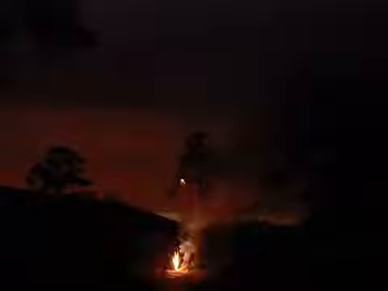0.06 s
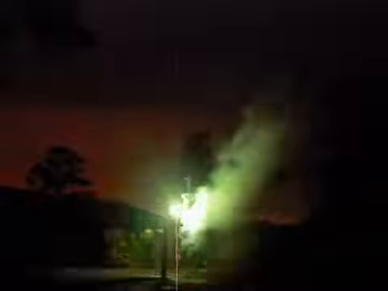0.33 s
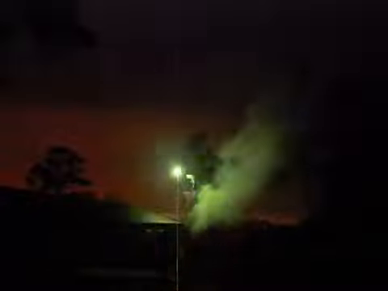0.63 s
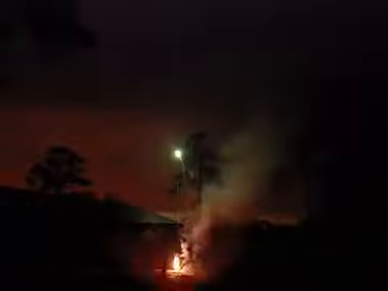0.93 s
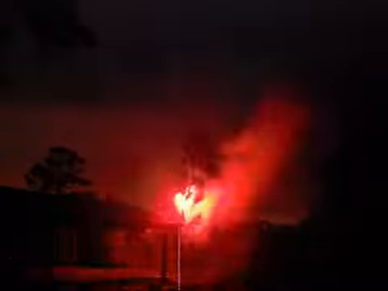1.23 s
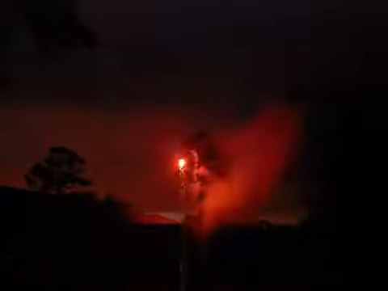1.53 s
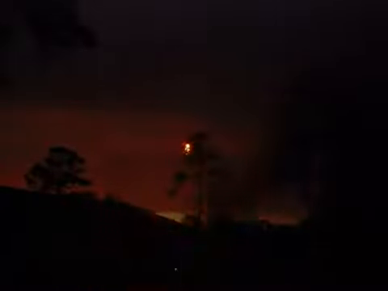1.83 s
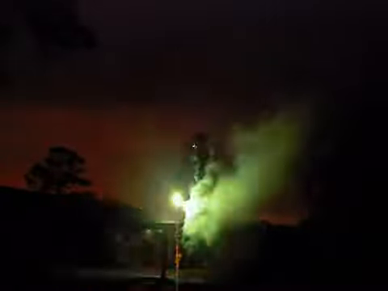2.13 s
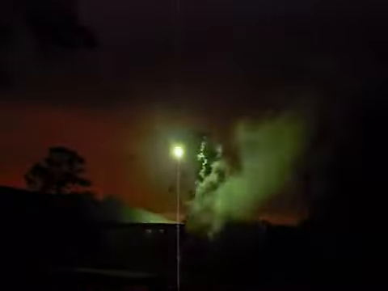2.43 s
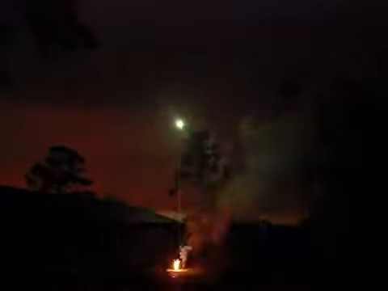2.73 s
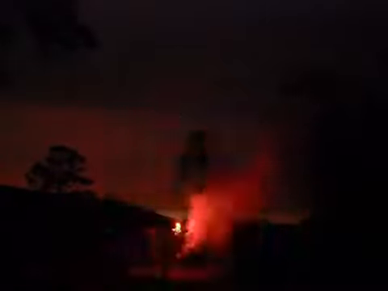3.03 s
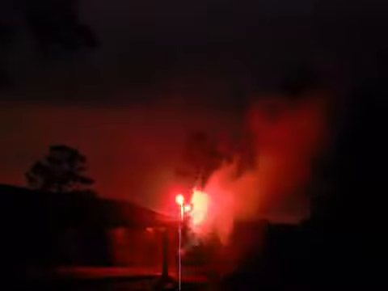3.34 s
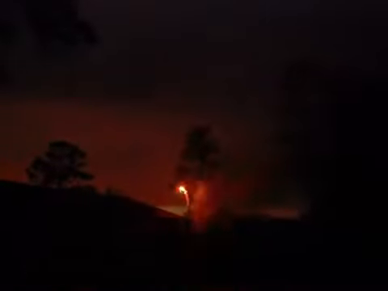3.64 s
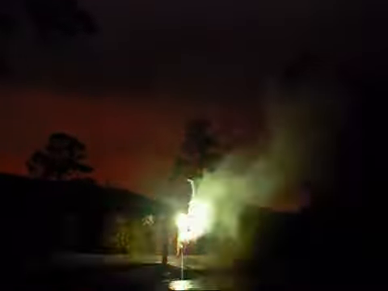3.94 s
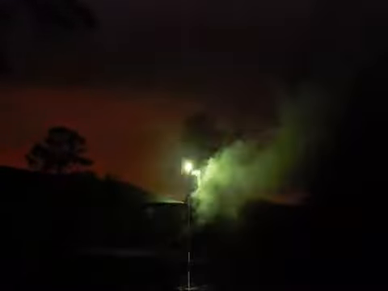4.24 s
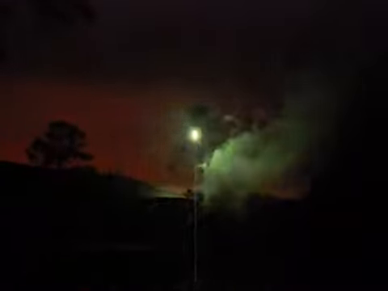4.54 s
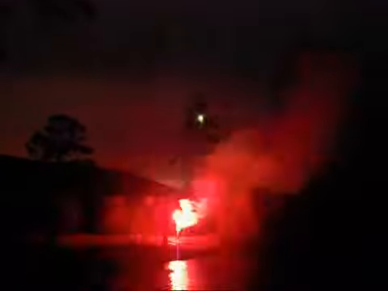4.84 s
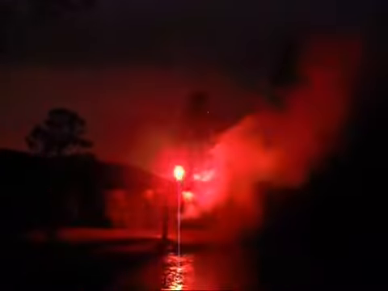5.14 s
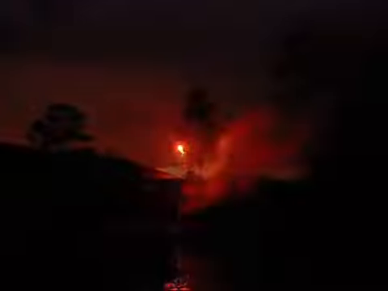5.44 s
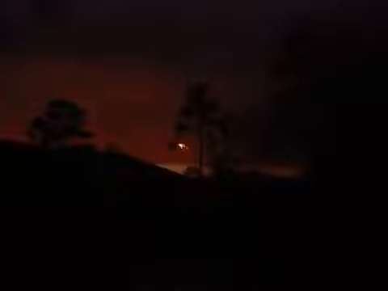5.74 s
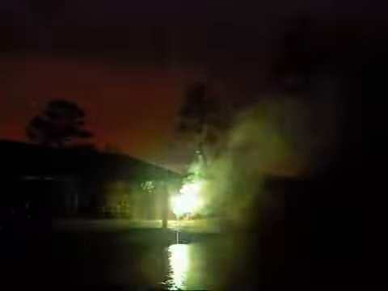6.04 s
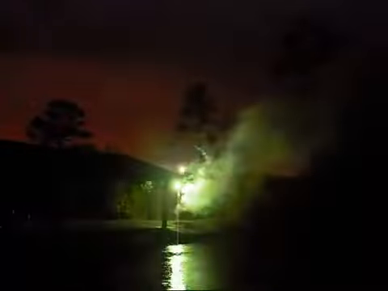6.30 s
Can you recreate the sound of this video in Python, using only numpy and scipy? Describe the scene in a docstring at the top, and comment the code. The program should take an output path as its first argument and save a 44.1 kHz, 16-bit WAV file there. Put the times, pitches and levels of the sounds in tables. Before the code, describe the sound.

The tail of an earlier firework shot dies away, then six more blasts crack out at an even pace, close and slightly distorted. Each leaves a short echo and a longer rolling decay across open ground and trees. Faint far pops and dry snaps fill the gaps, and a thin fuse hiss and sputter follows the last shot. The background is soft outdoor night air with barely audible distant traffic.

```python
"""A firework cake fires six shots beside a pond at night, close enough to overload the microphone.
Each blast (shock front, suction, gas crack, tube ring) scatters off the ground, a house and the trees,
then rolls away; an earlier shot is still dying at the start. Dull far pops and dry crackles fall between
the shots, and a fuse fizzes near the end. Under it all: faint night air, far tyres and an engine hum."""
import sys
import numpy as np
from scipy import signal
from scipy.fft import rfft, irfft, next_fast_len
from scipy.io import wavfile
from scipy.ndimage import map_coordinates

SR = 44100
rng = np.random.default_rng(int(sys.argv[2]) if len(sys.argv) > 2 else 0)


def store_wav(level_fs):
    """Save 16-bit WAV to argv[1]."""
    pcm = np.round(np.clip(np.atleast_2d(level_fs), -1, 1) * 32767)
    wavfile.write(sys.argv[1], SR, pcm.T.astype(np.int16))


N = 285327

# Escaping-gas spectrum: f/Hz, level/dB
GAS_SPECTRUM = [(60, -11), (150, 0.5), (300, 5.5), (480, 8.5), (600, -10), (800, -5.5), (1200, -3),
                (2800, -3), (5000, -19), (12000, -39)]
TUBE_HZ, TUBE_T60_S = 788, 0.026


def blast(front_db, push_ms, suction_db, suction_ms, crack_db, ring_db):
    """Shock front, suction as the gas ball falls back, crack of escaping gas, ring of the empty tube."""
    t = np.arange(SR // 10) / SR
    ms = t * 1000
    front = amp(front_db) * (1 - ms / push_ms) * np.exp(-ms / push_ms) * rise(ms, 0.07)
    suction = -amp(suction_db) * np.exp(-((ms - suction_ms) / 0.6) ** 2)
    gas = noise(GAS_SPECTRUM, len(t)) * fade(t, 0.029) * rise(t, 0.0014)
    crack = amp(crack_db - 7) * gas / np.std(gas[:SR // 100])  # level set over the first 10 ms
    ring = amp(ring_db) * np.sin(2 * np.pi * TUBE_HZ * t) * fade(t, TUBE_T60_S) * rise(t, 0.00026)
    return front + suction + crack + ring


# Launches: t/s, front/dB, push length/ms, suction/dB, suction delay/ms, relative crack/dB, tube ring/dB
LAUNCHES = [(0.7499, 11, 0.99, -0.5, 3.1, 3.5, 4.5), (1.5927, 18, 0.52, 8, 3.6, -1, -28),
            (2.5426, 15.5, 0.39, 1.5, 3.84, 2, -4), (3.5428, 12, 0.97, -13, 2.7, 0.5, 2.5),
            (4.5383, 24, 0.27, 16, 3.87, -3, -23), (5.4542, 24, 0.31, 22.5, 4.44, 2.5, -19)]
EARLIER_SHOT_S, REVERB_GAIN_DB = -0.19, 1.1


def shots():
    """Each launch with its own reverberation, after the tail of an earlier shot."""
    out = np.zeros(N)
    add(out, EARLIER_SHOT_S, amp(REVERB_GAIN_DB) * reverberation())
    for start_s, *charge in LAUNCHES:
        add(out, start_s, blast(*charge))
        add(out, start_s, amp(REVERB_GAIN_DB) * reverberation())
    return out


# Spectra of near scatter, trees, far roll and walls: f/Hz, level/dB
NEAR_SPECTRUM = [(40, -34), (130, -45), (300, -3), (500, -1), (620, 1.5), (800, -4.5), (1250, -9.5),
                 (2000, 0.5), (2900, 2.5), (4200, -4), (5500, -1.5), (8000, -8.5), (12500, -16.5)]
TREE_SPECTRUM = [(40, -17), (200, -15), (400, -2), (750, 7), (1300, -8.5), (1900, -6), (2800, -1),
                 (4200, -5.5), (5500, -5), (8000, -9), (12500, -15.5)]
ROLL_SPECTRUM = [(60, -37), (250, -7.5), (450, -2.5), (730, 2.5), (1000, -1.5), (1300, -10), (1900, 0),
                 (2800, -6), (4500, -19.5), (8000, -22.5), (12500, -33)]
WALL_SPECTRUM = [(60, -34), (200, -17), (450, 0), (800, 5.5), (1300, -3.5), (2400, 5), (4000, -11.5),
                 (6000, -15.5), (12500, -46)]
# Decay among the trees, the top treble shortened by the air: f/Hz, t60/s
TREE_T60 = [(100, 0.43), (700, 0.29), (2500, 1), (5500, 0.92), (8000, 0.69), (12000, 0.55)]
# Echoes off walls and tree lines: delay/s, relative level/dB, t60/s, rise/s
WALL_ECHOES = [(.03, -19.5, 0.041, 0.0012), (.047, -16.5, 0.068, 0.0022), (.0645, -18.5, 0.083, 0.0033),
               (.124, -26, 0.056, .005), (.138, -25.5, .04, .001), (.197, -29.5, 0.069, 0.0019)]


def reverberation():
    """One shot scattered by near ground and house, trees and single walls, with a long far roll."""
    size = 2 * SR
    t = np.arange(size) / SR
    near = amp(-10.5) * noise(NEAR_SPECTRUM, size) * fade(t, 0.22) * rise(t, 0.0022)
    hz, frame_s, bins = signal.stft(noise(TREE_SPECTRUM, size), SR, nperseg=256)
    bins = bins * fade(frame_s, along(TREE_T60, hz)[:, None])
    trees = amp(-20.5) * signal.istft(bins, SR, nperseg=256)[1][:size] * rise(t, 0.004)
    roll = amp(-31) * noise(ROLL_SPECTRUM, size) * fade(t, 2.177) * rise(t, 0.16)
    grain_db = 0.6 * wobble(70, size) + 1.3 * wobble(900, size)  # separate trunks and roofs
    tail = (near + trees + roll) * amp(grain_db)
    echo_t = t[:SR // 5]
    for delay_s, level_db, t60_s, rise_s in WALL_ECHOES:
        envelope = amp(level_db + rng.normal(0, 0.97)) * fade(echo_t, t60_s) * rise(echo_t, rise_s)
        add(tail, delay_s, envelope * noise(WALL_SPECTRUM, len(echo_t)))
    return tail


# Far pops, about half a second from the shots: t/s, level/dB
FAR_POPS = [(0.248, -28), (1.129, -31), (2.0695, -25), (2.939, -31.5), (3.982, -26.5), (4.93, -28.5),
            (6.077, -34)]
# Pop spectrum before the treble cut: f/Hz, level/dB
POP_SPECTRUM = [(60, -2), (300, 1.5), (750, 12.5), (1300, -12), (2200, -3), (3200, 1), (5000, 1),
                (7000, -13), (12500, -19)]


def pops():
    """Far pops arrive blurred, with a soft front and a short tail."""
    out = np.zeros(N)
    t = np.arange(SR // 3) / SR
    envelope = rise(t, 0.00068) * (fade(t, 0.044) + amp(-14.5) * fade(t, 0.14))
    for start_s, level_db in FAR_POPS:
        burst = noise(POP_SPECTRUM, len(t))
        dulled = filtered(burst, lambda hz: amp(along([(1500, 0), (5000, -5)], hz)))
        add(out, start_s, amp(level_db) * dulled * envelope)
    return out


# Dry snaps: t/s, peak level/dB, f/Hz, half-width/octaves, click re body/dB
SNAPS = [(0.08, -24.5, 2720, 0.31, -21), (2.2654, -22.5, 730, 0.59, -2), (2.292, -25.5, 4140, 0.55, -7),
         (2.4605, -22.5, 2320, 0.2, -11), (3.1498, -26.5, 897, 0.08, -20), (3.795, -17, 2350, .17, -20),
         (6.309, -31, 2130, 0.21, -14), (6.4273, -28, 900, 0.56, -15)]
SNAP_T60_CYCLES, CLICK_HZ, CLICK_T60_S = 27, 2900, 0.011


def crackles():
    """Dry snaps: one band of noise under a bright click; low ones last longer."""
    out = np.zeros(N)
    t = np.arange(SR // 6) / SR
    for start_s, peak_db, hz, octaves, click_db in SNAPS:
        body = band(hz, octaves, len(t)) * fade(t, SNAP_T60_CYCLES / hz)
        click = amp(click_db) * band(CLICK_HZ, 0.28, len(t)) * fade(t, CLICK_T60_S)
        snap = (body + click) * rise(t, 0.0003)
        add(out, start_s, amp(peak_db) * snap / np.abs(snap).max())
    return out


def fuse(hiss_start_s=5.9, sputter_start_s=6.24):
    """The fuse catches and burns towards the next tube: a thin hiss, then a lower, uneven sputter."""
    t = np.arange(N) / SR
    hiss = amp(-56.5 + 1.4 * wobble(120, N)) * band(6900, 0.33, N)
    hiss *= rise(np.maximum(t - hiss_start_s, 0), 0.25)
    sputter = amp(-44 + 3 * wobble(60, N)) * band(950, 0.25, N)
    sputter *= rise(np.maximum(t - sputter_start_s, 0), 0.094)
    return hiss + sputter


# Night air spectrum: f/Hz, level/dB
AIR_SPECTRUM = [(15, -24), (25, -8), (75, -5), (113, -3.5), (228, -5), (273, -8.5), (364, -8), (404, -8.5),
                (524, -8.5), (697, -15), (978, -7.5), (1200, -16), (3070, -14.5), (5030, -20.5),
                (12500, -32.5), (16200, -65), (22000, -120)]
# Night air loudness: t/s, level/dB
AIR_LULL = [(0, -46), (3.4, -47), (4.4, -47.5), (5.3, -46.5), (6.47, -44.5)]


def air():
    """Night air: broad, slowly drifting noise that lulls in the middle."""
    level_db = np.interp(np.arange(N) / SR, *np.transpose(AIR_LULL))
    return amp(level_db + 0.6 * wobble(6.27, N)) * noise(AIR_SPECTRUM, N)


def tyres(centre_hz, width_hz):
    """The narrow, wavering roar of tyres on a far road."""
    roar = filtered(rng.standard_normal(N), lambda hz: 1 / (1 + np.abs((hz - centre_hz) / width_hz) ** 3))
    return amp(wobble(16, N)) * unit(roar)


def traffic(car_fade_db_per_s=10):
    """A steady far murmur, and one car drawing away at the start."""
    t = np.arange(N) / SR
    murmur = amp(-52) * tyres(centre_hz=719, width_hz=146)
    car = amp(-39 - car_fade_db_per_s * t) * tyres(centre_hz=609, width_hz=113)
    return murmur + car


def engine(hum_hz=105.3, fade_db_per_s=1.2, swell_db=9.5, pass_s=3.2, swell_s=0.4):
    """A far engine's wavering hum fades slowly and swells once as it passes."""
    t = np.arange(N) / SR
    level_db = -56 - fade_db_per_s * t + swell_db / (1 + ((t - pass_s) / swell_s) ** 2)
    pitch_hz = hum_hz + 2.65 * wobble(3.5, N)
    note = np.sin(2 * np.pi * np.cumsum(pitch_hz) / SR)
    waver = amp(-0.5) * band(hum_hz, 0.046, N)
    return amp(level_db) * unit(note + waver)


def amp(db):
    """dB to gain."""
    return 10 ** (np.asarray(db) / 20)


def unit(x):
    """Scale to rms 1."""
    return x / np.sqrt(np.mean(x ** 2) + 1e-20)


def along(points, hz):
    """Interpolate (f/Hz, value) points on a log axis."""
    point_hz, values = np.transpose(points)
    return np.interp(np.log(hz + 1), np.log(point_hz), values)


def wobble(knots_per_s, size):
    """Smooth random curve."""
    knots = rng.standard_normal(size // 16)
    return map_coordinates(knots, [np.arange(size) * knots_per_s / SR], mode="mirror")


def filtered(x, response):
    """Zero-phase filter with gain response(hz)."""
    padded = next_fast_len(len(x) + SR // 4)
    return irfft(rfft(x, padded) * response(np.fft.rfftfreq(padded, 1 / SR)), padded)[:len(x)]


def noise(spectrum, size):
    """Coloured noise, rms 1."""
    return unit(filtered(rng.standard_normal(size), lambda hz: amp(along(spectrum, hz))))


def band(centre_hz, octaves, size):
    """Noise in one bell-shaped band, rms 1."""
    white = rng.standard_normal(size)
    return unit(filtered(white, lambda hz: 1 / (1 + (np.log2((hz + 1) / centre_hz) / octaves) ** 4) ** .5))


def fade(t, t60_s):
    """Gain falling 60 dB in t60_s."""
    return np.exp(-np.log(1000) * t / t60_s)


def rise(t, tau):
    """Gain building to 1; tau in the unit of t."""
    return 1 - np.exp(-t / tau)


def add(out, start_s, sound):
    """Mix in at start_s, which may be negative."""
    i = round(start_s * SR)
    part = sound[max(-i, 0):max(len(out) - i, 0)]
    out[max(i, 0):][:len(part)] += part


def scene():
    """All sources at one microphone."""
    return (shots() + pops() + crackles() + fuse() + air() + traffic() + engine())[None]


MIC_HZ, CLIP_LEVEL = 12700, 0.96


def record(dry):
    """The band-limited microphone stage clips on every blast and rounds the clipped edges."""
    narrowed = signal.sosfilt(signal.ellip(10, 0.3, 70, MIC_HZ, fs=SR, output="sos"), dry[0])
    clipped = narrowed / (1 + np.abs(narrowed / CLIP_LEVEL) ** 8) ** (1 / 8)
    rounded = filtered(clipped, lambda hz: amp(along([(MIC_HZ, 0), (13500, -9), (16000, -14)], hz)))
    return signal.sosfilt(signal.cheby2(12, 70, 16800, fs=SR, output="sos"), rounded)[None]


dry = scene()
out = record(dry)
store_wav(out)
```